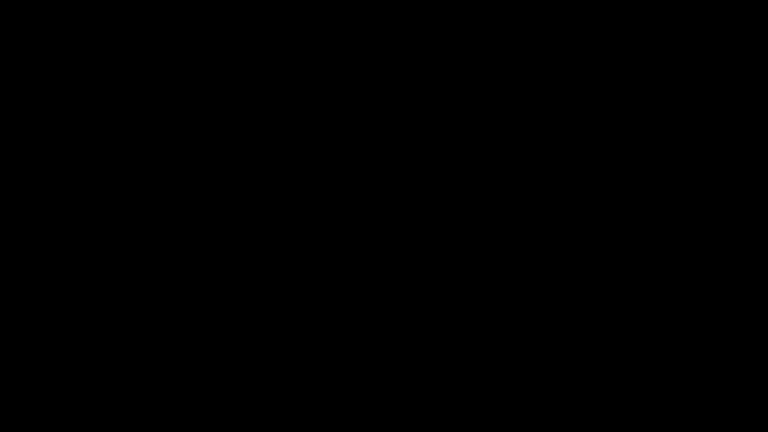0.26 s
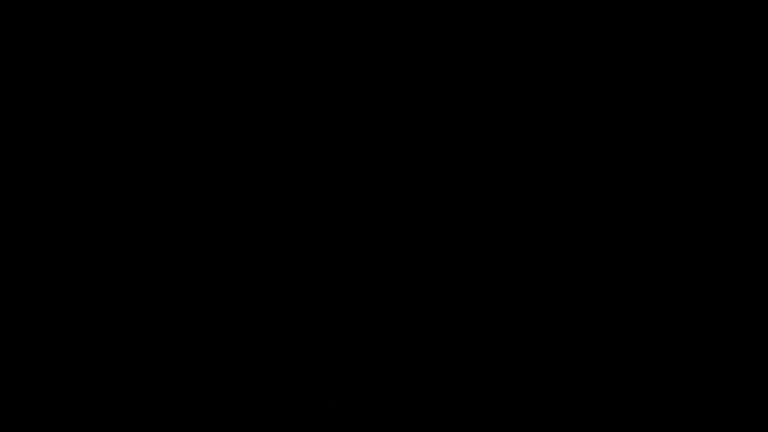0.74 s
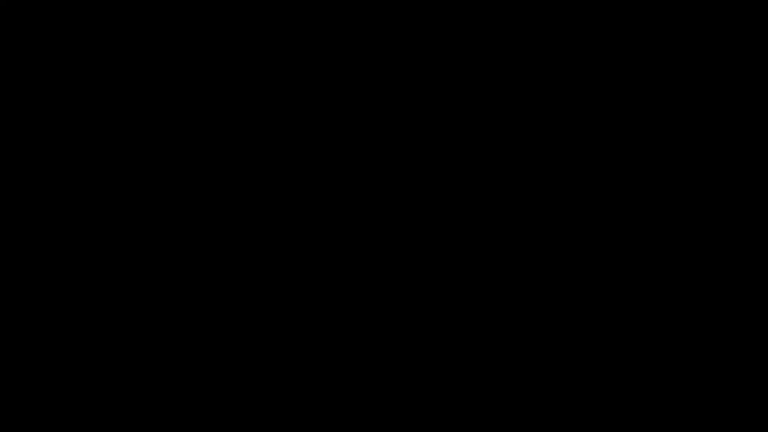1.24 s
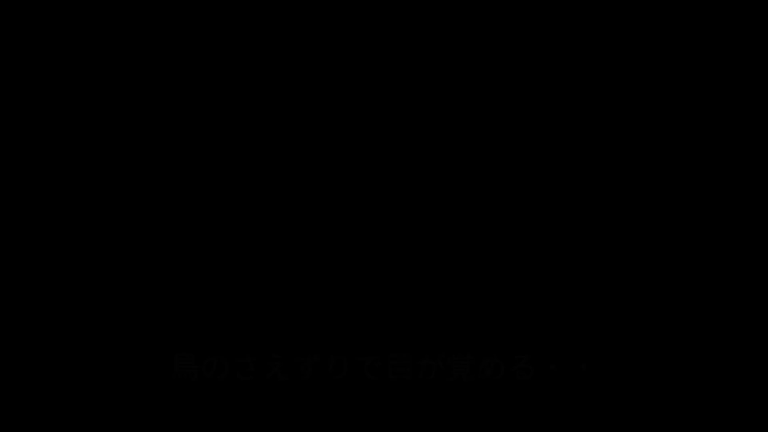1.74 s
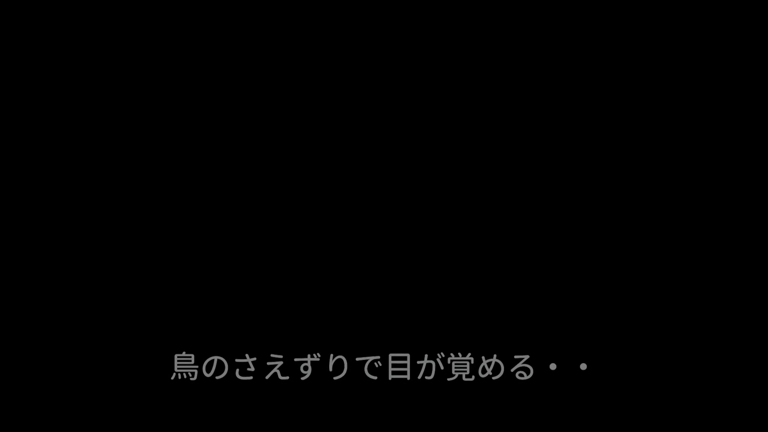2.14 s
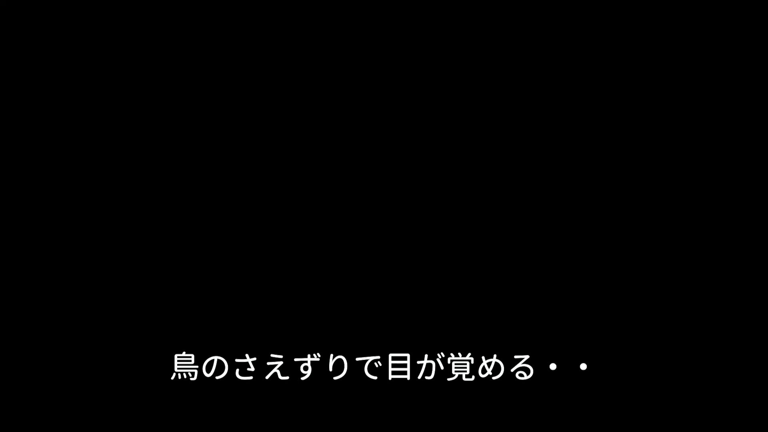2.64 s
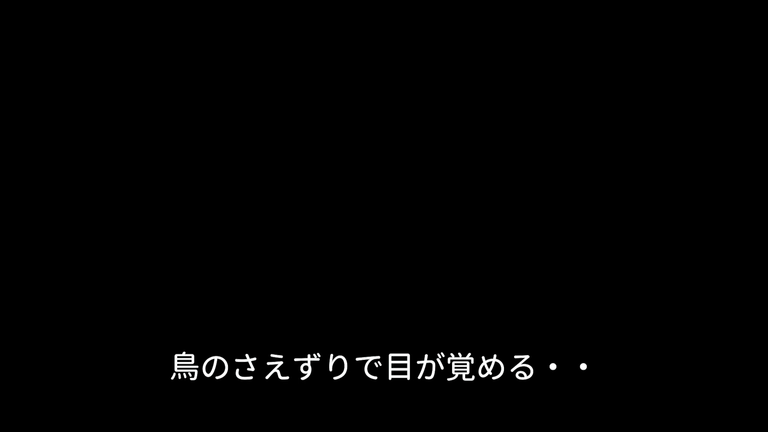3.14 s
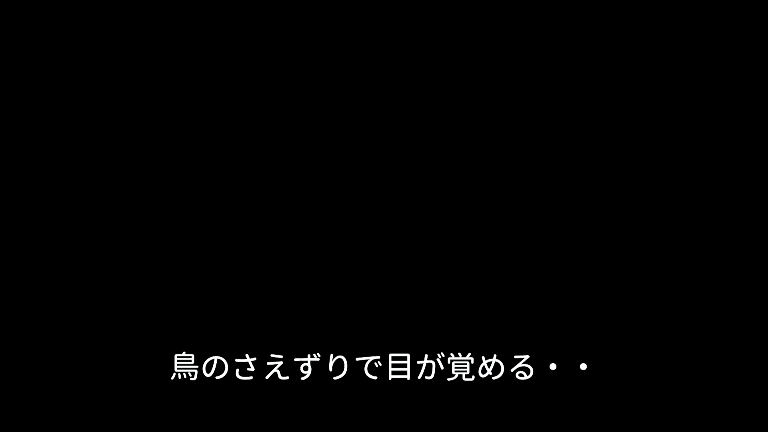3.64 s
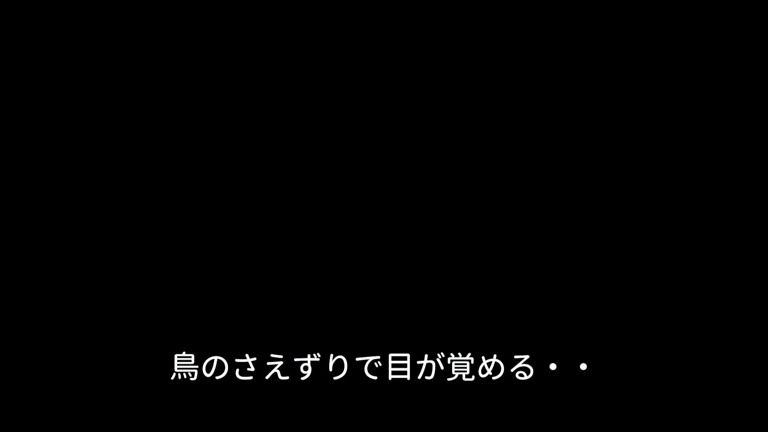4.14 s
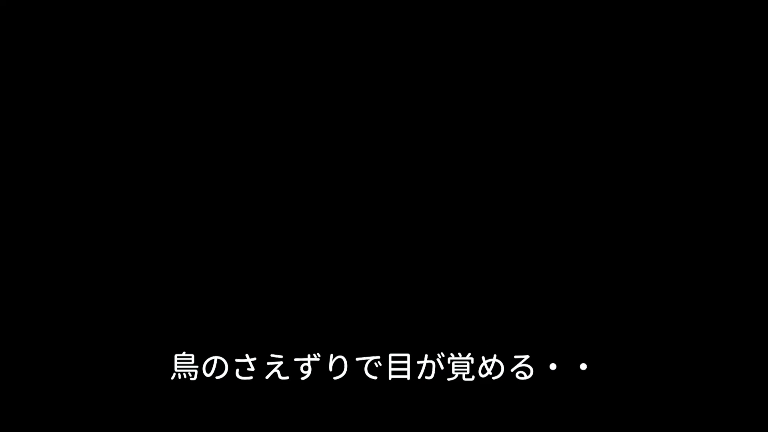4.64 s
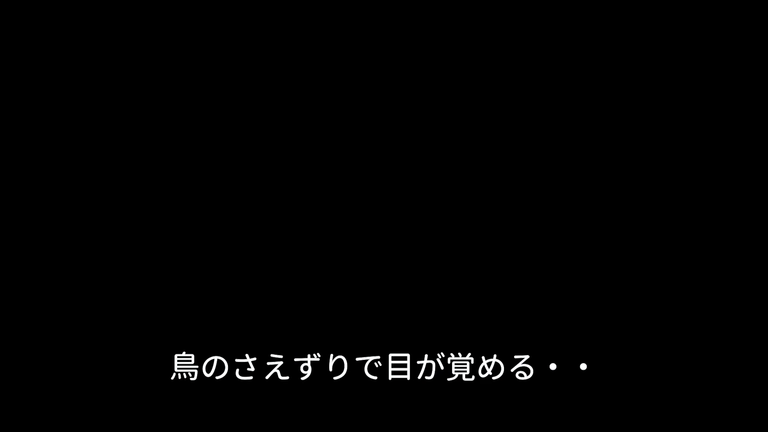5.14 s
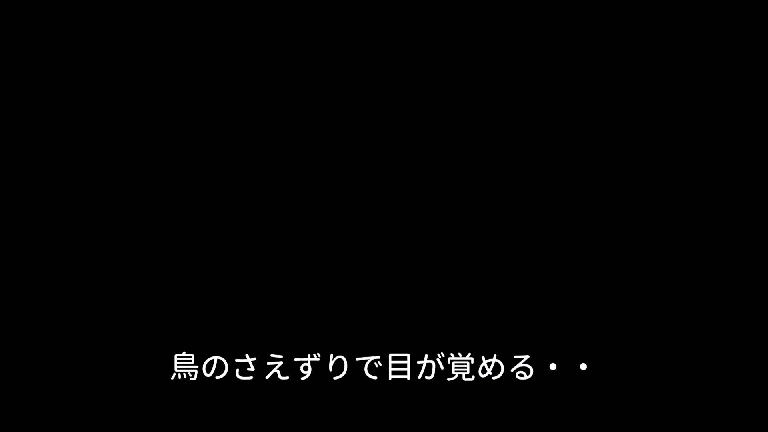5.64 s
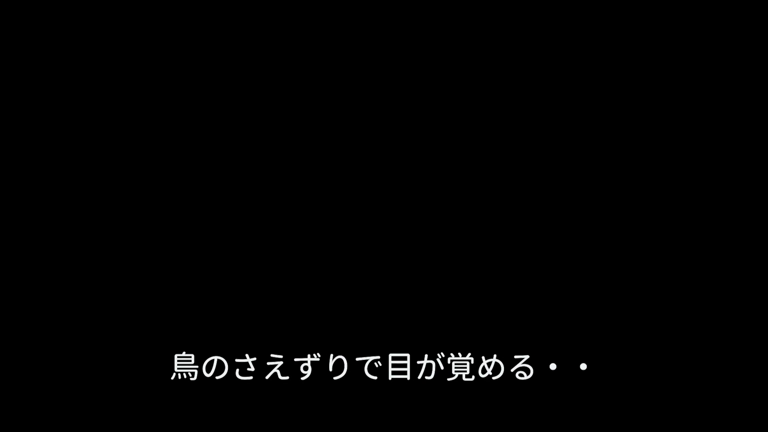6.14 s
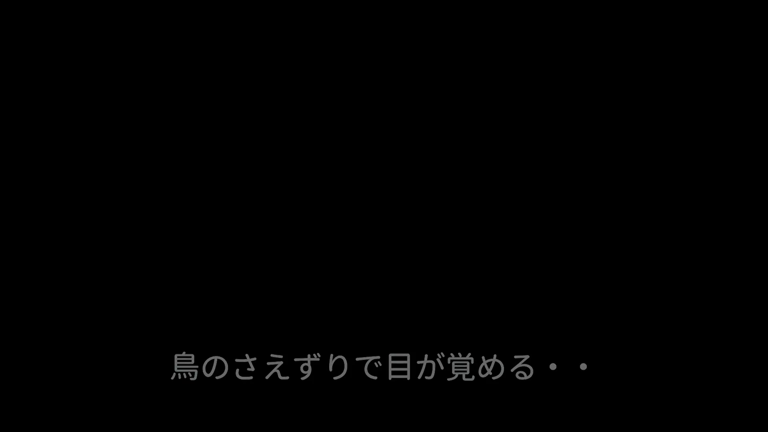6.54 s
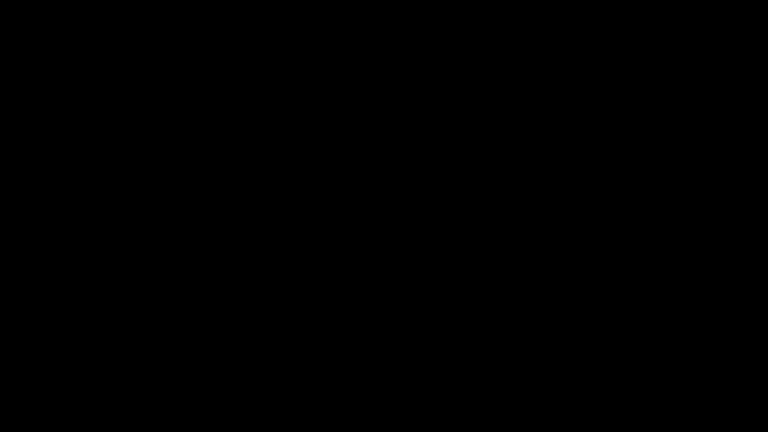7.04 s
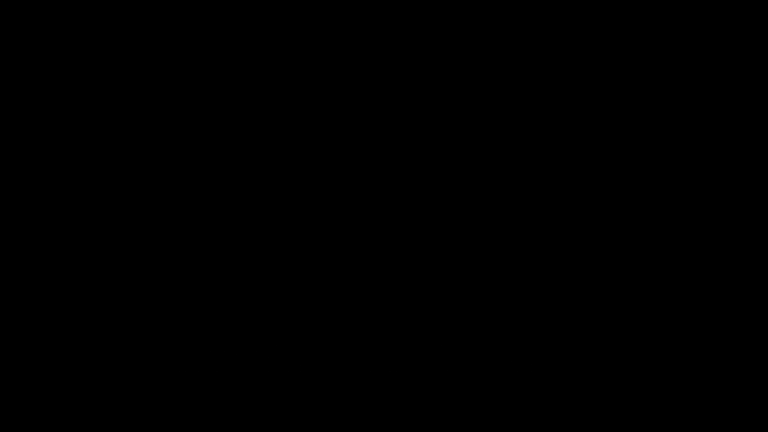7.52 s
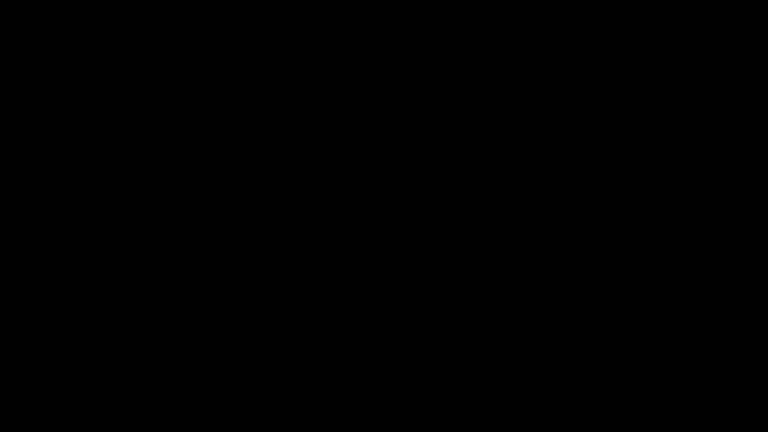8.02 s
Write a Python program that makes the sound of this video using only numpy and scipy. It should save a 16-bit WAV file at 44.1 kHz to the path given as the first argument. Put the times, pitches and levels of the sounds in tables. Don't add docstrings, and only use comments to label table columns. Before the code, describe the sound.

Many wild birds sing at a wood's edge, opening suddenly from faint to full, then fading as gritty hiss and ticks rise near the microphone.

```python
import sys
import numpy as np
from scipy import signal
from scipy.fft import rfft, irfft, next_fast_len
from scipy.io import wavfile

SR = 44100
rng = np.random.default_rng(int(sys.argv[2]) if len(sys.argv) > 2 else 0)


def dump_mix(stems):
    frames = np.atleast_2d(stems).T
    limited = np.clip(frames, -1, 1)
    pcm = np.round(limited * 32767).astype(np.int16)
    wavfile.write(sys.argv[1], SR, pcm)


def convert_level_to_amplitude(level_db):
    exponent = np.asarray(level_db, float) / 20
    return 10 ** exponent


N = 365148

# start_s, length_s, from_hz, to_hz, level_db
HARSH_CALLS = [
    (2.65, .148, 3667, 4316, -55.5),
    (4.635, 0.11, 3495, 4053, -54),
]
# freq_hz, correlation
LIKENESS = [(40, 1), (125, 0.93), (300, 0.66), (700, 0.13), (3000, 0.077)]


def at_hz(points, hz):
    table_hz, value = np.transpose(points)
    return np.interp(np.log(hz), np.log(table_hz), value)


def in_time(rows):
    s, *columns = np.transpose(rows)
    return [np.interp(np.arange(N) / SR, s, c) for c in columns]


def sides(pan_db):
    return convert_level_to_amplitude(np.array([[.5], [-.5]]) * pan_db)


def glides(rows, ratio):
    return [(s, length_s, hz, hz * ratio, db) for s, length_s, hz, db in rows]


def sing(notes, pan_db, bend=0.99, rasp=.1, wobble_hz=30, overtones=(), rate=300, edge_s=0.0099):
    out = np.zeros(N + SR)
    for start_s, length_s, from_hz, to_hz, db in notes:
        count = int((length_s + 0.01237) * SR)
        u = np.arange(count) / count
        knots = rng.standard_normal((2, 400))
        shake, waver = [np.interp(np.arange(count) * rate / SR, np.arange(400), k) for k in knots]
        pitch_hz = from_hz + (to_hz - from_hz) * u ** bend + wobble_hz * waver
        phase = 2 * np.pi * np.cumsum(pitch_hz) / SR
        tone = np.sin(phase)
        for ratio, overtone_db in overtones:
            tone += convert_level_to_amplitude(overtone_db) * np.sin(ratio * phase)
        from_edge_s = np.minimum(u, 1 - u) * count / SR
        swell = np.sin(np.pi / 2 * np.minimum(1, from_edge_s / edge_s)) ** 2
        at = max(int((start_s - .004) * SR), 0)
        out[at:at + count] += np.sqrt(2) * convert_level_to_amplitude(db) * tone * swell * (1 + rasp * shake)
    return out[:N] * sides(pan_db)


def trees(x, direct_db, scatter_db, t60, rise_s=0.0019):
    s = np.arange(SR // 2) / SR
    envelope = convert_level_to_amplitude(-60 * (s / t60) ** 0.98) * (1 - np.exp(-s / rise_s))
    tail = rng.standard_normal((2, len(s))) * envelope
    tail /= np.sqrt(np.sum(tail ** 2, axis=1, keepdims=True))
    scatter = signal.fftconvolve(x, tail, axes=1)[:, :N]
    return convert_level_to_amplitude(direct_db) * x + convert_level_to_amplitude(scatter_db) * scatter


def drift(rate):
    knots = int(N / SR * 400)
    return np.interp(np.arange(N) * rate / SR, np.arange(knots), rng.standard_normal(knots)) * 1.2


def coloured_noise(spectrum, patchy_db, rate, likeness=LIKENESS):
    # freq_hz, left_over_right_db
    leaning = [(40, 0), (125, 1), (350, 3), (700, 0.5), (2500, 7.5), (8000, 4.5)]
    size = next_fast_len(N, True)
    hz = np.maximum(np.fft.rfftfreq(size, 1 / SR), 1)
    mid, side = rfft(rng.standard_normal((2, size)))
    alike = np.clip(at_hz(likeness, hz), -1, 1)
    pair = np.sqrt(1 + alike) * mid + np.sqrt(1 - alike) * side * [[1], [-1]]
    inside = (hz > spectrum[0][0]) & (hz < spectrum[-1][0])
    pair = pair * sides(at_hz(leaning, hz)) * convert_level_to_amplitude(at_hz(spectrum, hz)) * inside
    group = np.round(2 * np.log2(hz)).astype(int) % 4
    out = np.zeros((2, N))
    for k in range(4):
        out += irfft(pair * (group == k), size)[:, :N] * convert_level_to_amplitude(patchy_db * drift(rate))
    return out / np.sqrt(np.mean(out.mean(0) ** 2))


def whistler():
    # start_s, top_to_low_span_s, top_db, slide_db, low_db
    phrases = [(.13, 0.24, -55, -64, -59), (.513, .23, -46.5, -53.5, -56.5), (.905, 0.24, -54, -62, -57.5),
               (1.306, 0.25, -56.5, -59, -62.5), (1.731, .249, -55.5, -63.5, -67),
               (2.148, 0.24, -56.5, -67.5, -63), (2.567, 0.25, -59.5, -65.5, -65.5),
               (3.002, 0.28, -57.5, -68, -66), (3.45, .274, -59.5, -70, -66),
               (3.893, 0.27, -64, -71, -67.5), (4.356, 0.34, -58.5, -78, -67.5),
               (6.02, 0.26, -70, -67, -70)]
    phrase_notes = [
        (0, 0.021, 3020, 3000),
        (0.438, 0.033, 2556, 1570),
        (0.998, .045, 2346, 2210),
    ]
    parts = []
    for k, (place, length_s, from_hz, to_hz) in enumerate(phrase_notes):
        parts.append([(s + place * span_s, length_s, from_hz, to_hz, levels_db[k])
                      for s, span_s, *levels_db in phrases])
    high, slide, low = parts
    flicks = [(s + 0.022, .03, 2880, 2600, db - 11) for s, span_s, db, *lower_db in phrases]
    near = sing(high + low, pan_db=5.5, bend=.8, rasp=0.35, wobble_hz=20, edge_s=.02)
    near += sing(slide + flicks, pan_db=5.5, bend=.7, rasp=.6, wobble_hz=110, rate=500)
    wall_echo = convert_level_to_amplitude(-13) * np.roll(near, int(.076 * SR), axis=1)
    return near + wall_echo


def high_singer():
    # start_s, length_s, level_db, following_drop_db
    thin_notes = [(1.918, .04, -74, -90), (2.054, 0.023, -67, -97), (2.296, 0.053, -66, -92),
                  (2.452, 0.068, -74, -60.5), (2.727, 0.064, -64, -62.5), (2.881, 0.053, -66, -59.5),
                  (3.156, 0.072, -66.5, -64), (3.32, 0.069, -71, -56), (3.608, 0.061, -68, -62),
                  (3.774, 0.069, -71, -90)]
    mid_hz, rise_hz_per_s = 7053, 4800
    drop_after_s, drop_s, drop_from_hz, drop_to_hz = .084, 0.0213, 6400, 5250
    thin, drops = [], []
    for s, length_s, db, drop_db in thin_notes:
        half_rise_hz = rise_hz_per_s * length_s / 2
        thin.append((s, length_s, mid_hz - half_rise_hz, mid_hz + half_rise_hz, db))
        drops.append((s + drop_after_s, drop_s, drop_from_hz, drop_to_hz, drop_db - 3.5))
    rising = sing(thin, pan_db=-1.0, rasp=0.59, wobble_hz=35, edge_s=0.019)
    return rising + sing(drops, pan_db=3.0, bend=.4, rasp=.6, wobble_hz=70, rate=1000)


def warbler():
    # start_s, length_s, from_hz, level_db, pan_db
    great_rises = [
        (3.017, 0.099, 3390, -60.5, 2.5),
        (3.36, 0.073, 3946, -60, 2),
        (4.975, .087, 3300, -60, 1.5),
    ]
    # start_s, level_db
    small_rises = [
        (.72, -82),
        (1.225, -72),
        (5.63, -80),
    ]
    # length_s, from_hz, to_hz
    small_rise = (.08, 3500, 6000)
    # start_s, length_s, from_hz, level_db
    dives_left = [(1.45, 0.037, 5700, -75), (4.6, 0.036, 4720, -69), (2.6, 0.053, 5200, -70.5),
                  (1.707, 0.057, 6950, -77), (1.755, 0.054, 5500, -72), (1.795, 0.057, 4470, -65.5),
                  (1.92, 0.12, 5325, -66.5), (2.16, 0.036, 5200, -68.5), (2.24, 0.05, 5600, -75),
                  (2.69, 0.053, 6300, -74), (2.81, 0.04, 6260, -73), (2.83, 0.057, 5450, -66.5),
                  (2.9, 0.03, 3730, -73), (3.06, 0.049, 4180, -66.5), (3.853, 0.038, 6490, -72.5),
                  (3.89, 0.056, 5000, -76), (4.245, .04, 5200, -63), (4.2, .05, 6600, -76),
                  (3.68, .03, 6500, -72), (4.27, 0.043, 4330, -61.5), (4.43, .085, 7100, -75.5),
                  (4.775, 0.042, 4310, -65), (5.49, 0.035, 5900, -86), (7.969, 0.039, 5150, -70),
                  (7.355, 0.038, 4130, -78), (3.4, .08, 4690, -73), (7.225, 0.024, 3300, -70.5)]
    dips_left = [(2.2, 0.05, 3800, -69), (2.199, 0.0303, 3430, -66), (1.485, 0.077, 4300, -69),
                 (3.2, .05, 5100, -73.5), (3.3, 0.062, 4600, -62)]
    dips_ahead = [(1.22, 0.045, 7250, -81.5), (2.375, 0.048, 4850, -61), (4.205, 0.045, 6920, -78),
                  (0.97, 0.018, 6900, -77)]
    buzzes_ahead = [(1.72, 0.066, 5670, -72), (2.111, 0.095, 5880, -72.5), (2.284, 0.13, 6200, -76.5),
                    (2.35, .06, 5500, -69.5), (2.55, 0.088, 5140, -75), (3.75, 0.043, 4100, -64),
                    (4.07, 0.037, 5400, -86), (4.914, 0.071, 6720, -79.5), (4.9, 0.05, 4620, -78),
                    (5.28, 0.063, 4800, -83), (6.71, .04, 4784, -82), (7.245, 0.019, 1660, -65.5),
                    (7.275, 0.013, 1740, -67), (7.794, 0.053, 1700, -69), (8.2, 0.03, 1796, -65.5)]
    dive_ratio, dip_ratio, buzz_ratio = .73, .86, 0.95
    top_hz, hold_s, top_loss_db = 6870, 0.025, 13

    buzz = dict(bend=.75, rasp=.5, wobble_hz=165, rate=1000)
    left = glides(dives_left, dive_ratio) + glides(dips_left, dip_ratio)
    left += [(s, *small_rise, db) for s, db in small_rises]
    cracks = [(s + length_s - .05, .02, 5100, 2500, db - 7) for s, length_s, hz, to_hz, db in HARSH_CALLS]
    ahead = glides(dips_ahead, dip_ratio) + glides(buzzes_ahead, buzz_ratio)
    out = sing(left + cracks, 3.9, **buzz) + sing(ahead, 0.74, **buzz)
    for s, length_s, hz, db, pan_db in great_rises:
        rise = (s, length_s, hz, top_hz, db)
        held = (s + length_s, hold_s, top_hz, top_hz, db - top_loss_db)
        out += sing([rise, held], pan_db, bend=.72, rasp=.5, wobble_hz=230, rate=1100)
    return out


def harsh_caller():
    partials = [(1.5, -19.0), (1.92, -26.0), (0.41, -33)]
    return sing(HARSH_CALLS, pan_db=6.0, bend=0.93, rasp=0.41, wobble_hz=83.0, edge_s=0.033,
                overtones=partials)


def hooks():
    # start_s, level_db
    hook_rows = [
        (4.899, -64),
        (5.425, -63),
        (5.961, -63),
        (6.506, -64),
    ]
    rise_s, from_hz, top_hz = 0.033, 2950, 3550
    settle_s, settle_hz, settle_loss_db = 0.0306, 3300, 2
    rises = [(s, rise_s, from_hz, top_hz, db) for s, db in hook_rows]
    return rises + [(s + rise_s, settle_s, top_hz, settle_hz, db - settle_loss_db) for s, db in hook_rows]


def others():
    # start_s, length_s, from_hz, level_db
    pipes_left = [(0, 0.033, 4240, -70), (.49, .03, 3820, -61), (.595, .02, 3900, -68),
                  (.672, 0.017, 5420, -74), (.765, 0.091, 3900, -67.5), (.87, .015, 3700, -78),
                  (.99, 0.023, 4600, -77), (1.078, 0.048, 3990, -64), (1.125, 0.13, 4030, -67.5),
                  (1.24, 0.025, 3900, -67), (5.17, 0.058, 3995, -72), (6.47, 0.036, 3750, -77),
                  (6.96, .02, 3160, -76), (7.0, 0.055, 2510, -79), (6.5, .05, 2010, -75),
                  (1.875, 0.019, 3050, -63), (3.697, 0.043, 2082, -66), (3.785, 0.026, 3950, -63.5),
                  (3.883, 0.013, 2780, -62), (4.537, .05, 4230, -66.5), (5.323, 0.018, 3860, -72),
                  (5.584, 0.04, 2650, -61.5), (5.741, .018, 3160, -71), (5.837, 0.032, 4440, -74),
                  (6.354, 0.052, 3900, -68), (6.75, 0.024, 3960, -71), (6.95, 0.034, 3870, -73),
                  (7.413, 0.022, 2690, -59.5), (7.457, 0.06, 3550, -67)]
    pipes_ahead = [(.103, 0.035, 4480, -68), (.7, .024, 4340, -70), (2.33, 0.077, 3478, -65),
                   (4.187, 0.095, 3305, -63), (4.307, 0.043, 5150, -72), (4.72, 0.059, 4420, -67.5),
                   (5.07, 0.023, 2650, -63), (5.697, 0.033, 5200, -76), (5.767, 0.04, 2440, -69.5),
                   (6.11, 0.029, 6200, -76), (6.75, 0.039, 2640, -68), (6.97, 0.025, 2320, -71.5),
                   (7.217, 0.013, 3354, -59), (7.504, 0.03, 4570, -69), (7.693, 0.017, 2620, -65),
                   (7.894, 0.1, 3360, -65), (7.91, 0.076, 5170, -73)]
    droops_left = [(.1, .03, 5150, -70), (.17, .04, 4600, -72), (.575, 0.046, 4970, -72),
                   (2.765, 0.016, 4700, -62), (6.77, .02, 2560, -73), (.943, 0.028, 4200, -71),
                   (1.035, 0.06, 5190, -79), (1.55, 0.12, 4060, -71), (3.7, .04, 4400, -67),
                   (4.44, .08, 3800, -72), (3.627, 0.021, 4340, -64), (4.576, 0.044, 4030, -64),
                   (4.715, .059, 3240, -72), (5.09, 0.021, 2450, -65), (5.603, 0.019, 2550, -68),
                   (6.125, .038, 4430, -71), (7.126, .031, 4030, -73.5), (7.184, 0.043, 3710, -71),
                   (7.23, 0.032, 3020, -77), (7.665, 0.035, 5120, -75)]
    droops_ahead = [(.757, .025, 4110, -65), (2.909, 0.029, 3500, -67), (3.22, 0.066, 4230, -68),
                    (3.506, 0.042, 3430, -69), (4.112, 0.069, 3950, -69.5), (7.906, 0.016, 2900, -67),
                    (8.06, 0.014, 2510, -68)]
    lifts_left = [(1.4, .02, 3400, -60), (6.7, .04, 2500, -70), (5.22, 0.0586, 2290, -67),
                  (7.17, .019, 4350, -79), (8.243, 0.032, 3200, -65)]
    lifts_ahead = [(1.2, 0.051, 3300, -74), (3.714, 0.0071, 5250, -63), (4.1, .06, 3920, -75),
                   (5.63, 0.077, 4200, -77), (5.25, 0.053, 3650, -76), (7.43, 0.039, 3280, -86)]
    # start_s, length_s, level_db
    slur_rows = [(0.442, 0.072, -68), (5.508, 0.07, -71), (5.766, 0.04, -70.5), (5.936, 0.045, -77),
                 (6.448, .074, -73), (7.552, 0.053, -73), (7.745, 0.069, -77.5)]
    # start_s, length_s, from_hz, to_hz, level_db
    wide_whistles = [(.245, .11, 2900, 5200, -70.5), (1.225, .035, 3200, 4000, -69),
                     (4.5, .04, 2500, 1700, -73), (2.2, .03, 3450, 2950, -66),
                     (2.39, .065, 4500, 4050, -66), (1.99, .06, 4400, 3850, -69),
                     (1.49, .06, 4250, 3750, -69), (6.27, 0.0194, 1900, 2700, -71),
                     (5.995, 0.026, 3300, 2700, -67), (6.54, .035, 3000, 2000, -73),
                     (4.5, 0.0304, 2600, 2100, -72), (3.4, .03, 3400, 2700, -70.5),
                     (2.06, .04, 3300, 3900, -72), (6.145, 0.0407, 3800, 4640, -63),
                     (6.191, .04, 4650, 3800, -71)]
    pipe_ratio, droop_ratio, lift_ratio = 0.98, .91, 1.2
    slur_from_hz, slur_to_hz = 4760, 3900

    warble = dict(rasp=.55, wobble_hz=45, rate=420)
    left = glides(pipes_left, pipe_ratio) + glides(droops_left, droop_ratio) + glides(lifts_left, lift_ratio)
    ahead = glides(pipes_ahead, pipe_ratio) + glides(droops_ahead, droop_ratio)
    ahead += glides(lifts_ahead, lift_ratio)
    between = [(s, length_s, slur_from_hz, slur_to_hz, db) for s, length_s, db in slur_rows]
    between += hooks() + wide_whistles
    return sing(left, 6.4, **warble) + sing(ahead, 0.56, **warble) + sing(between, 3.3, **warble)


def birds():
    out = trees(whistler(), 0.0, -2.4, t60=0.53)
    out += trees(high_singer(), -2, -2.5, t60=.3)
    out += trees(warbler(), -.8, 4.4, t60=0.46, rise_s=.006)
    return out + trees(harsh_caller() + others(), -1.8, -1.2, t60=.42, rise_s=.008)


def far_birds(count, db):
    start, length, pitch, slur, loudness, side = rng.random((count, 6)).T
    from_hz = 2300 * 2 ** (1.25 * pitch)
    to_hz = from_hz * (.7 + .25 * slur)
    level_db = db - 5 * loudness - 4.5 * start
    notes = np.c_[8.2 * start, .04 + .06 * length, from_hz, to_hz, level_db]
    husky = dict(bend=1, rasp=.6, wobble_hz=120, rate=600, edge_s=.02)
    both = sing(notes[side < .5], 6, **husky) + sing(notes[side >= .5], -2, **husky)
    return trees(both, -20, 1, t60=.55, rise_s=.02)


def ticks():
    # start_s, peak_db, knock_db, ring_hz
    tick_rows = [(0.401, -71, -69.5, 5000), (6.299, -49.5, -62, 7000), (6.417, -66, -78, 7600),
                 (6.452, -67, -80, 8000), (6.555, -63, -80, 6300), (6.601, -58, -77, 7600),
                 (6.7425, -58, -73, 8000), (6.7875, -47, -68, 7600), (6.803, -60, -80, 7200),
                 (6.813, -49, -70, 6800), (6.821, -56, -80, 6800), (7.306, -60, -50, 4500),
                 (7.3466, -37, -74, 7300), (7.353, -55, -80, 7500), (7.4293, -75, -49, 5000),
                 (7.4345, -66, -70, 6500), (7.4757, -47, -73, 7800), (7.594, -65, -80, 6000),
                 (7.6572, -45, -47, 6500), (7.6632, -40, -47, 6800), (7.659, -56, -80, 10500),
                 (7.666, -58, -80, 14000), (7.672, -57, -80, 11500), (7.672, -46, -70, 7600),
                 (7.675, -54, -68, 6500), (7.7336, -60, -51, 6000), (7.7972, -62, -64, 5500),
                 (7.8355, -69, -58, 5000), (7.9154, -59, -70, 6500), (8.039, -72, -56, 5000),
                 (8.1, -61, -70, 6010), (8.125, -60, -70, 6000), (8.157, -61, -51, 4000),
                 (8.19, -66, -52, 5000)]
    right_after_s, left_pan_db, right_pan_db = 7.6, 8, -3.5
    ring_width_hz, snap_db = 1700, -18
    bright, knock = np.zeros((2, N)), np.zeros((2, N))
    s = np.arange(900) / SR
    for start_s, db, knock_db, hz in tick_rows:
        at = int(start_s * SR)
        noise = rng.standard_normal((2, len(s)))
        band_hz = [hz - ring_width_hz / 2, hz + ring_width_hz / 2]
        resonance = signal.butter(2, band_hz, "band", fs=SR, output="sos")
        ring = signal.sosfilt(resonance, noise[0] * np.exp(-s / .0016))
        snap = convert_level_to_amplitude(snap_db) * np.diff(noise[0] * np.exp(-s / 0.0005), prepend=0) / 2
        pan_db = left_pan_db if start_s < right_after_s else right_pan_db
        bright[:, at:at + len(s)] += (ring / np.abs(ring).max() + snap) * convert_level_to_amplitude(db - 1.5) * sides(pan_db)
        knock[:, at:at + len(s)] += noise[1] * np.exp(-s / 0.004) * convert_level_to_amplitude(knock_db + 7.0)
    dull = signal.butter(2, [450, 2600], "band", fs=SR, output="sos")
    return bright + signal.sosfilt(dull, knock + 1e-18)


def grit():
    bumps_per_s, bump_db, decay_s = 140, 6.0, .004
    bumps = (rng.random(N) < bumps_per_s / SR) * rng.exponential(0.46, N)
    decaying = signal.lfilter([1], [1, -np.exp(-1 / (decay_s * SR))], bumps + 1e-18)
    return convert_level_to_amplitude(bump_db * np.minimum(decaying, 1)) * .8


def roadside():
    # time_s, hiss_db
    road_curve = [(5.2, -125), (6.4, -80.5), (7.3, -69.5), (7.6, -72), (8.0, -64), (8.12, -63.5),
                  (8.28, -58)]
    # freq_hz, density_db_per_hz
    road_spectrum = [(500, 3.5), (1200, -5), (1750, -1), (2600, -10.5), (5000, -13.5), (8000, -13.5),
                     (11000, -22.5), (12400, -33), (13800, -33), (15500, -34)]
    return convert_level_to_amplitude(in_time(road_curve)[0]) * grit() * coloured_noise(road_spectrum, patchy_db=1.3, rate=25)


def traffic():
    # time_s, rumble_db, drone_db
    traffic_curve = [(.69, -41.5, -62), (2, -42, -67), (3, -42.5, -63), (4.5, -41.5, -62.5),
                     (5.7, -40.5, -61.5), (6.5, -43.5, -66), (7.3, -45.5, -65), (8.28, -48, -73.5)]
    # freq_hz, density_db_per_hz
    rumble_spectrum = [(22, -32), (36, -20.5), (52, 0.5), (70, -1.5), (125, -4.5), (226, -12), (269, -12.5),
                       (500, -28.5), (650, -48.5)]
    drone_spectrum = [(330, -6), (480, -1), (700, -4), (880, -5), (1010, -11), (1500, -28.5)]
    rumble_db, drone_db = in_time(traffic_curve)
    rumble = convert_level_to_amplitude(rumble_db) * coloured_noise(rumble_spectrum, patchy_db=1.75, rate=6)
    return rumble + convert_level_to_amplitude(drone_db) * coloured_noise(drone_spectrum, patchy_db=1.1, rate=5)


def leaves():
    # time_s, hiss_db
    leaf_curve = [(0, -70), (2, -70), (3.3, -69.5), (5, -71), (6.5, -73), (8.28, -76)]
    # freq_hz, density_db_per_hz
    leaf_spectrum = [(1000, -16), (1250, 0), (1600, -3), (2300, -4), (3200, -9), (4000, -9), (5000, -12),
                     (6300, -15)]
    top_spectrum = [(8000, -21), (10000, -24), (12000, -25.5), (13600, -25), (13800, -45), (15500, -44)]
    # freq_hz, correlation
    port_likeness = [(7900, 0), (8300, -.85), (8800, -1), (9550, -1), (9650, 0), (10300, 0), (10500, 1),
                     (11700, 1), (11800, 0), (12350, 0), (12450, -1), (13700, -1), (13900, 0)]
    hiss = coloured_noise(leaf_spectrum + top_spectrum, patchy_db=.9, rate=9,
                          likeness=LIKENESS + port_likeness)
    return convert_level_to_amplitude(in_time(leaf_curve)[0]) * hiss


def scene():
    # time_s, gain_db
    gain_curve = [
        (0, -25),
        (.39, -23.5),
        (.43, -28.5),
        (.62, -30),
        (.668, -31),
        (.671, -2),
        (.8, 2.1),
    ]
    wood = birds() + far_birds(count=360, db=-73.5) + leaves() + traffic()
    return wood * convert_level_to_amplitude(in_time(gain_curve)[0]) + roadside() + ticks()


def roll_off(x):
    return signal.sosfilt(signal.butter(12, 15600, fs=SR, output="sos"), x)


def record(dry):
    self_noise_db = -103
    band = signal.butter(2, [3500, 12000], "band", fs=SR, output="sos")
    hiss = signal.sosfilt(band, rng.standard_normal(dry.shape))
    return roll_off(dry + convert_level_to_amplitude(self_noise_db) * hiss)


dry = scene()
out = record(dry)
dump_mix(out)
```